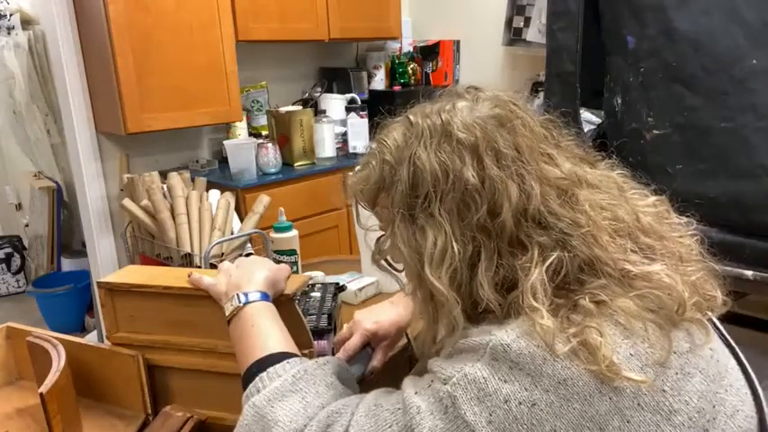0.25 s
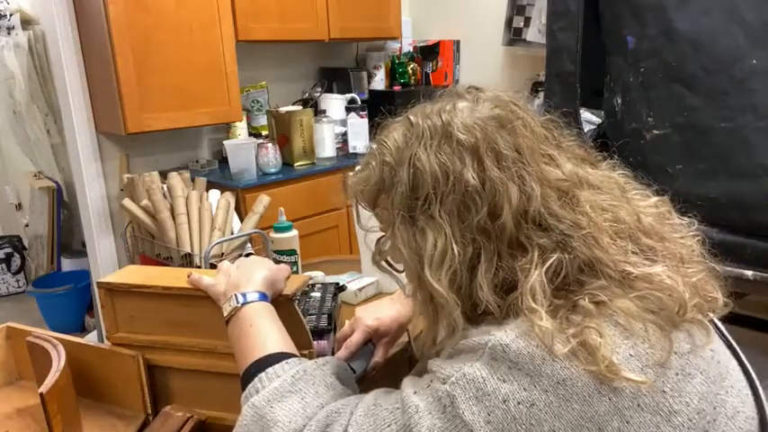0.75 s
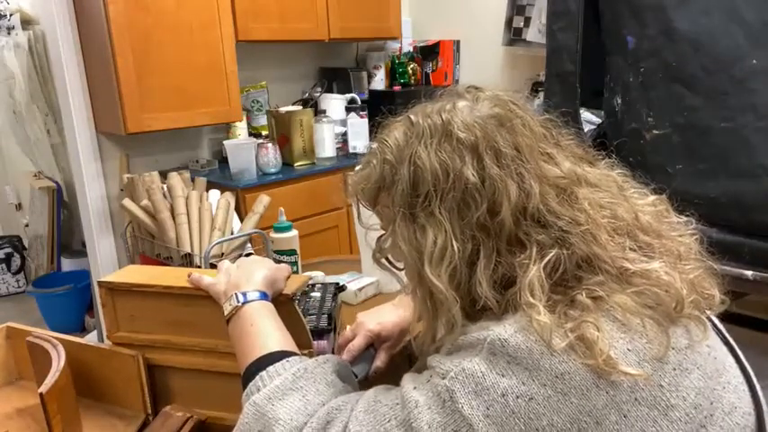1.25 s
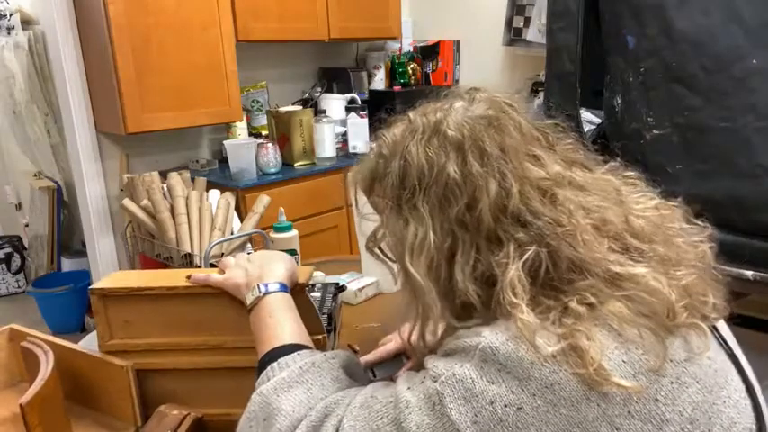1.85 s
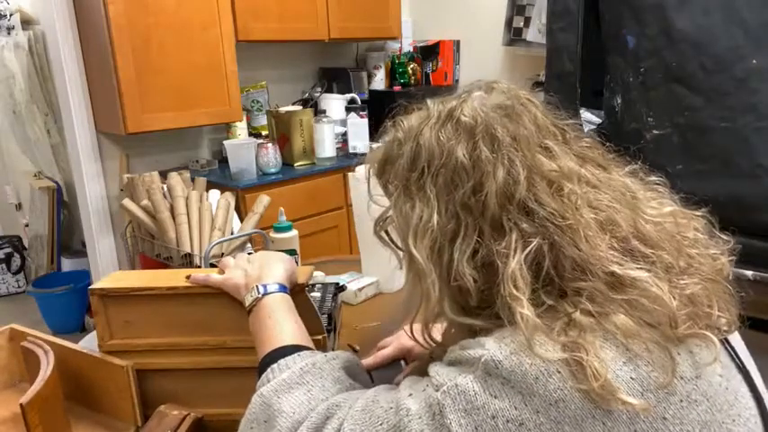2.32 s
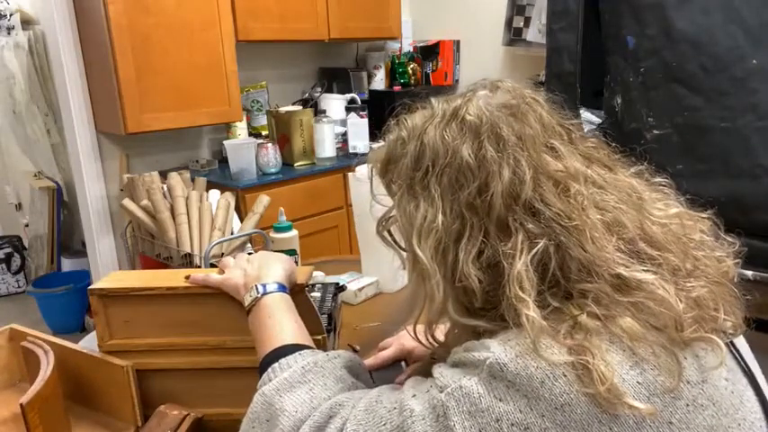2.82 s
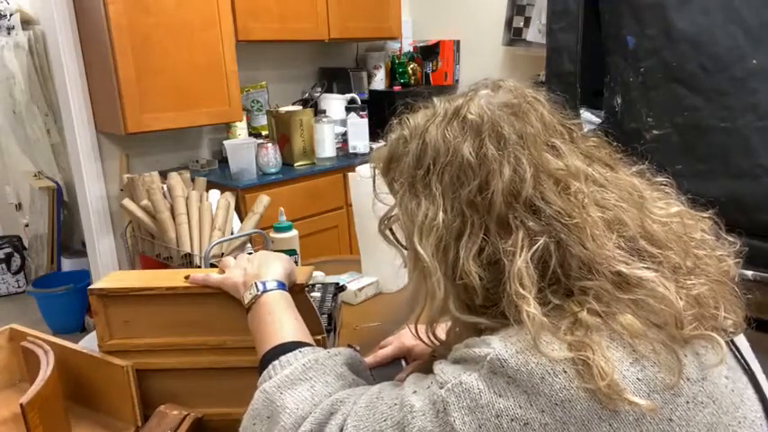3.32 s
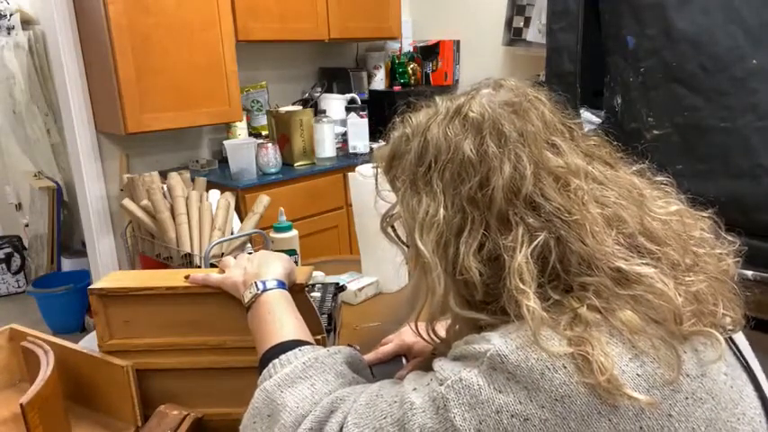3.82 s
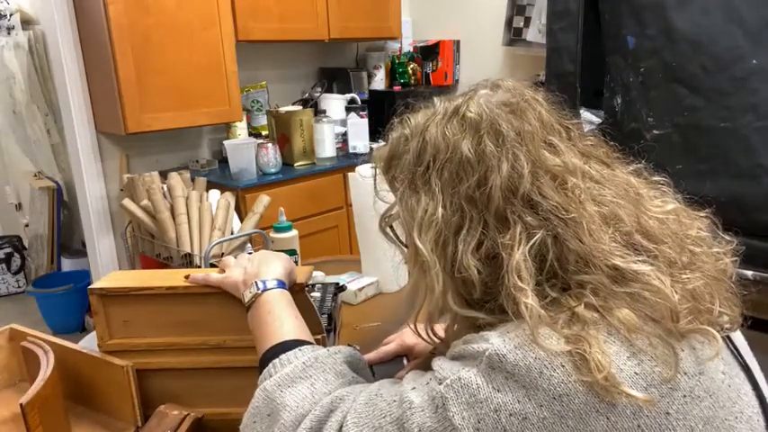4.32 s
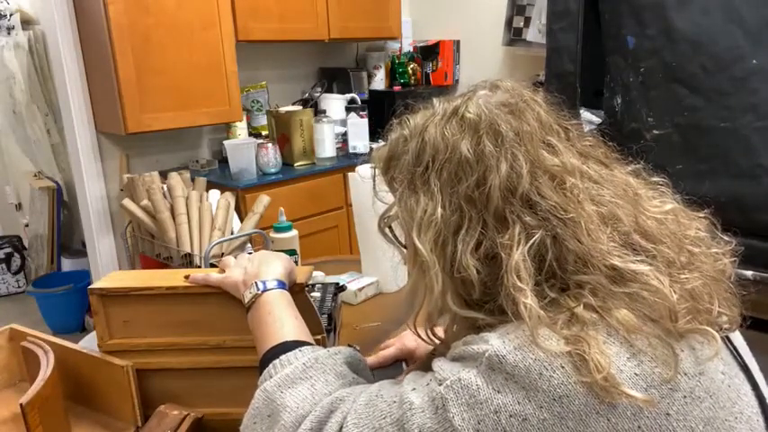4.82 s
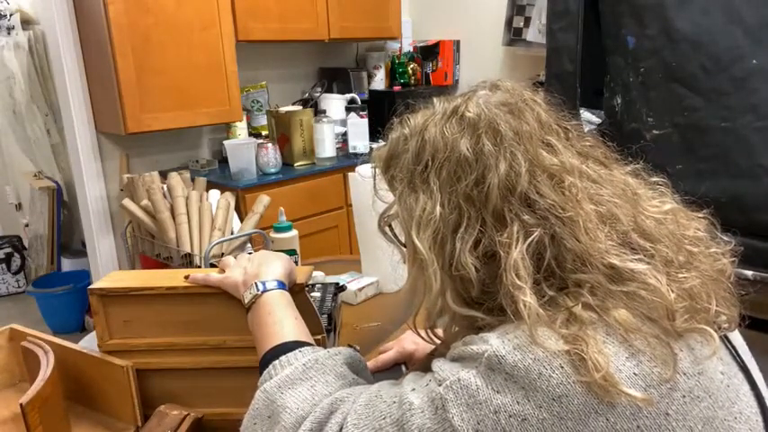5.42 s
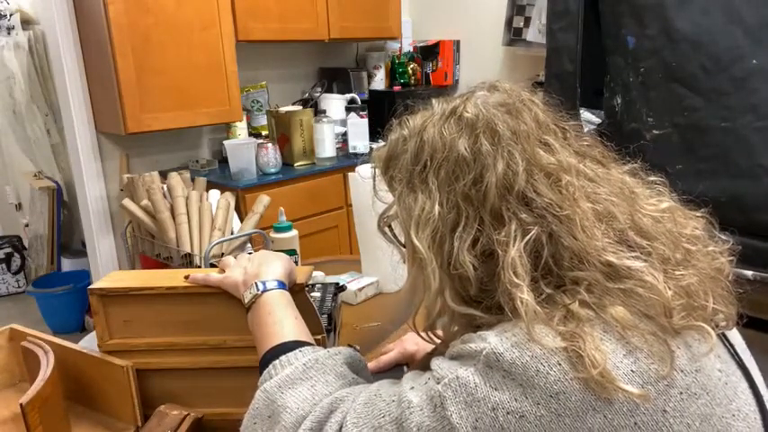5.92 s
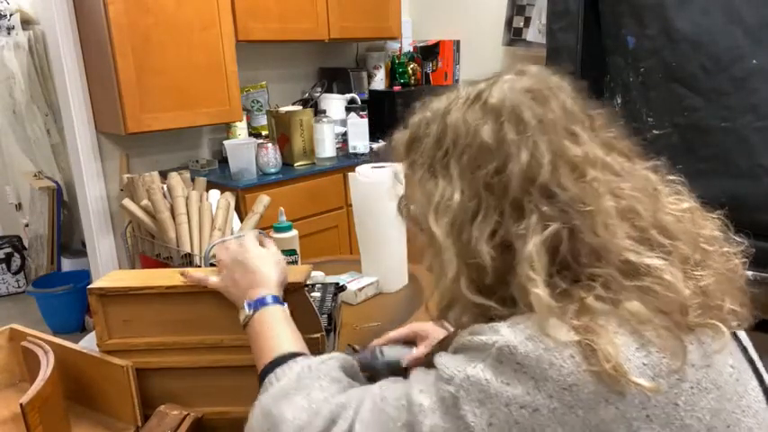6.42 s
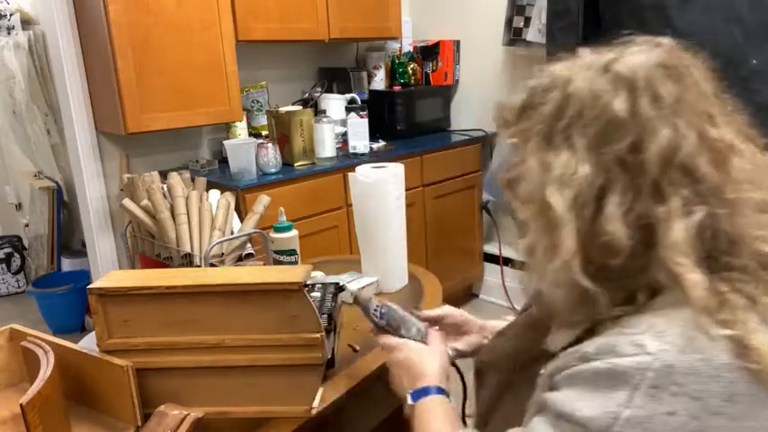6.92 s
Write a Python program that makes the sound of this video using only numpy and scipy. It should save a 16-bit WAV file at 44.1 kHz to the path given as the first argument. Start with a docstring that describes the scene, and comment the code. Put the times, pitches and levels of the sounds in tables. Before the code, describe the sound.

Close high-speed motor whine and rushing air, with four gritty, buzzing grinding passes on hollow wood, a sharp knock between them, then free running.

```python
"""A handheld rotary tool grinds old glue off a wooden drawer in a workshop, heard through one microphone.
Its motor sags under load and recovers; the fan whines at 18 times shaft speed over rushing cooling air.
The bit strikes the wood once a turn: a buzz of shaft overtones, uneven chatter and gritty hiss.
Thumps, a few knocks that ring the drawer and bounces of the bit on every second turn join in,
over low workshop rumble."""
import sys
import numpy as np
from scipy import signal
from scipy.fft import rfft, irfft
from scipy.io import wavfile
from scipy.ndimage import uniform_filter1d

SR = 44100
rng = np.random.default_rng(int(sys.argv[2]) if len(sys.argv) > 2 else 0)


def store_pcm(level_fs):
    """Save levels as 16-bit WAV."""
    pcm = np.round(np.clip(level_fs, -1, 1) * 32767).astype(np.int16)
    wavfile.write(sys.argv[1], SR, np.atleast_2d(pcm).T)


N = 315311
T = np.arange(N) / SR  # s

# shaft speed: time_s, speed_hz (turns per second)
SHAFT_SPEED = [(0.0, 419.6), (0.11, 418.9), (0.35, 406.6), (0.63, 396.8), (0.87, 393.0), (1.04, 394.2),
               (1.29, 391.6), (1.85, 408.1), (2.27, 414.2), (2.69, 398.1), (3.22, 383.0), (3.58, 380.2),
               (3.91, 373.3), (4.09, 374.4), (4.58, 399.5), (4.77, 399.0), (5.15, 409.8), (5.6, 403.6),
               (5.82, 403.2), (5.97, 406.5), (6.26, 405.6), (6.63, 413.6), (7.15, 418.2)]
# fan whine, swelling and fading as the tool turns in the hand: time_s, level_db
FAN_WHINE = [(0, -36.5), (.3, -38.5), (.7, -45), (1.4, -37), (1.74, -47), (2.1, -31), (2.32, -43.5),
             (2.7, -29.5), (2.95, -42), (3.15, -36), (3.8, -46), (3.98, -29), (4.3, -44), (4.64, -36.5),
             (5.1, -38.5), (5.38, -28), (5.68, -43.5), (6.06, -32), (6.5, -36), (6.62, -27), (6.94, -32),
             (7.1, -23)]
# tool body resting on the drawer, passing the shake on: start_s, end_s, level_db (before SHAKE_TRIM_DB)
BODY_LEAN = (1.39, 1.585, -42.5)
# shaft shake at firm pressure, one value per pass: level_db (before SHAKE_TRIM_DB)
PRESSED_SHAKE = [-26, -27, -27, -24.5]
# commutator lines round the 8th overtone: offset_hz, level_db
COMMUTATOR_LINES = [(-123, -49.5), (0, -51.5), (123, -56)]
# cooling air, louder once the tool leaves the drawer: time_s, level_db
AIR_LEVEL = [(0, -35.5), (1.5, -35.5), (2.2, -36), (4, -37), (5, -35), (6.3, -35), (6.6, -34),
             (7.15, -28.5)]
# cooling air spectrum: frequency_hz, relative_db (per Hz)
AIR_SPECTRUM = [(270, -12.5), (550, 5.5), (1000, 12.5), (1700, 8), (2700, 2), (3300, 7), (5000, 6),
                (7000, 10), (8300, 3), (13500, 1.5), (15600, -4)]
# workshop rumble spectrum: frequency_hz, relative_db (per Hz)
RUMBLE_SPECTRUM = [(20, -60), (40, -35), (65, 3), (160, -10), (300, -4.5), (900, -20.5)]
# low thumps of hand or tool on the bench: start_s, level_db
BENCH_THUDS = [(.002, -37), (1.339, -30), (1.605, -37), (4.538, -35), (6.24, -37)]
# one table per pass of the bit: time_s, buzz_level_db (pressure), brightness_db (per overtone), even_lift_db
BIT_PASSES = [
    [(.09, -29, -3, 7), (.178, -15, 2, -16), (.21, -28, -0.5, -3), (.3, -23.5, 1, -6), (.4, -26, -2, -7.5),
     (.52, -27, -1, -8), (.64, -23, -2.5, 2), (.74, -23, -1, 1), (.83, -20.5, -1.5, 1.5),
     (1.03, -29.5, -0.5, -1), (1.08, -29, 0, 6), (1.18, -25, 0, -3.5), (1.3, -26.5, 0, 4),
     (1.41, -39, -3, 6)],
    [(2.228, -30.5, -1.5, 8.5), (2.4, -26, 0, 6), (2.53, -30.5, 0, 2), (2.62, -27, -0.5, 2),
     (2.92, -29, -1, 5), (3.05, -27, -1.5, 3), (3.1, -22.5, 0.5, -1), (3.27, -23.5, 2, -3),
     (3.53, -26, -2, 4), (3.64, -19.5, 0, -0.5), (3.8, -22.5, 3.5, -10), (3.95, -27, -2, 5),
     (4.04, -24.5, 2, -7), (4.12, -30.5, -4, 7), (4.16, -34, 4.5, -10)],
    [(4.17, -35, -3, 3), (4.34, -37.5, -4.5, 5), (4.4, -42, -5.5, 10), (4.46, -43, 0, -4),
     (4.556, -43, -5, 6), (4.59, -28.5, -1.5, 1), (4.73, -30, -2, 5.5), (4.8, -41, -0.5, 8)],
    [(5.133, -32, 3, 1), (5.2, -26.5, 1, 0), (5.42, -27, 1.5, 3), (5.56, -28.5, -1, 2),
     (5.71, -27.5, -0.5, 3), (5.75, -38.5, 1, -2), (5.81, -27, -0.5, 4), (5.848, -63, -3, -4),
     (5.875, -29, -1, 2), (5.95, -44.5, 1, 7), (5.98, -34.5, 1, 0), (6.13, -26, 0, 2),
     (6.18, -31.5, -0.5, 7), (6.23, -27.5, 1, 1), (6.27, -48, 1, 14)],
]
# how the wood under the bit passes the buzz, one row per pass: relative_db of overtones 2, 3, 4, 5, 6
WOOD_RESPONSE = [(-7, -2.5, -5, -21, -10.5), (-6.5, 1, -4.5, -2.5, -9.5), (-4, -6, -6.5, 5, 3),
                 (4, 2, -7, -4, -4.5)]
# bit snagging in hard glue: centre_s, half_length_s, chatter_lift_db, grit_lift_db
GLUE_SNAGS = [(0.14, 0.086, -5, 4), (0.239, 0.048, 12, 6.5), (0.78, 0.051, 5, -4), (1.24, 0.29, 7, 1.5),
              (2.24, 0.044, -13, 5), (2.923, 0.36, 13, 1), (3.09, .1, -0.5, 3), (3.696, 0.16, 5, 7.5),
              (4.023, 0.23, 10, 10.5), (4.447, 0.042, 9, 11), (4.66, 0.23, 11.5, 3.5),
              (4.778, 0.014, 0, 11), (5.13, 0.11, -15, 11), (5.752, 0.042, 27.5, 3.5), (5.973, 0.093, 9, 9),
              (6.234, 0.044, 17.5, 0.5)]
# grit hiss spectrum: frequency_hz, relative_db (per Hz)
GRIT_SPECTRUM = [(600, -64), (1500, -33), (2500, 0.5), (3700, -0.5), (5000, -5.5), (7000, 7), (8200, -5.5),
                 (12000, -9.5), (15500, -18)]
# high shaft overtones: overtone_number, level_db (relative to the grit level)
HIGH_OVERTONES = [(7, -11), (9, -10.5), (12, -13), (17, -12), (21, -18), (28, -18), (36, -25)]
# bit against wood, one row per pass: high_overtone_lift_db, ring_hz, ring_height_db
BIT_RING = [(.5, 4900, 7), (-4, 3700, 4), (-1, 3600, 6), (-1, 3680, 7)]
# drawer modes: frequency_hz, relative_db, t60_s
DRAWER_MODES = [(190, -16, .05), (365, -5, .09), (500, -2, .03), (641, 0, .04), (830, -6, .025),
                (1020, -6, .025), (1276, -3, .03), (1560, -5, .03), (1950, -12, .025), (2514, -16, .03)]
# tool body against the drawer: time_s, level_db
BODY_KNOCKS = [(1.584, -13.5), (1.588, -6), (4.547, -22), (5.767, -35), (6.191, -32), (6.226, -26.5)]
# bit landing on every second turn: start_s, length_s, level_db
BIT_BOUNCES = [(3.911, 0.1, -43), (4.24, 0.12, -40), (4.35, 0.081, -40), (4.431, 0.15, -45),
               (4.562, 0.067, -43.5)]

# faint high tone, gliding with shaft speed and wavering slightly: offset above the fan whine, level
HIGH_TONE_OFFSET_HZ, HIGH_TONE_DB = 7000, -59
# free shake at or above TOP_SPEED_HZ, and its fall per Hz of speed below that; both before SHAKE_TRIM_DB
FREE_SHAKE_DB, TOP_SPEED_HZ, FREE_DB_PER_HZ = -42, 414.3, 0.9
# pressed shake: dB per dB of pressure, wood ring it swells near, pressure averaging time
SHAKE_DB_PER_DB, WOOD_RING_HZ, WOOD_RING_DB_PER_HZ2, BUILD_S = 0.9, 387.3, .025, 0.052
SHAKE_TRIM_DB = -2.5
MAINS_HZ = 120  # throb rate of the cooling air
RUMBLE_DB = -55.5
THUD_HZ, THUD_T60_S = 157, .14
FIRM_DB = -25  # buzz level at firm pressure
ATTACK_S, RELEASE_S = 0.0019, 0.012
CHATTER_DB, CHATTER_DB_PER_DB = -38.5, 0.95  # at firm pressure without snags; dB per dB of pressure
GRIT_DB, GRIT_DB_PER_DB = -37.5, 0.56
BASS_CUT_HZ, TREBLE_CUT_HZ = 48, 15720


def gain_of(db):
    """Amplitude factor of a level in dB."""
    return np.exp(np.asarray(db) * np.log(10) / 20)


def evened(x):
    """Scale to rms 1."""
    return x / np.sqrt(np.mean(x ** 2) + 1e-20)


def curves(rows):
    """Table columns as curves over all samples."""
    time_s, *columns = np.transpose(rows)
    return [np.interp(T, time_s, column) for column in columns]


def by_pass(rows):
    """Columns of a one-row-per-pass table, held over all samples."""
    later_starts_s = [rows_of_pass[0][0] for rows_of_pass in BIT_PASSES[1:]]
    return np.array(rows)[np.searchsorted(later_starts_s, T)].T


def waver(rate_hz):
    """Slow random curve of rms 1, low-passed near rate_hz."""
    knots = rng.standard_normal(N // 64 + 2)
    low_pass = 1 / (1 + (np.fft.rfftfreq(len(knots), 64 / SR) / rate_hz) ** 4)
    knots = evened(irfft(rfft(knots) * low_pass, len(knots)))
    ramps = np.diff(knots)[:, None] * np.arange(64) / 64
    return (knots[:-1, None] + ramps).ravel()[:N]


def noise(spectrum, patchy_db, band_hz=(0, SR)):
    """Coloured noise with drifting spectral patches; rms about 1 inside band_hz."""
    frames, hz = N // 256 + 5, np.fft.rfftfreq(1024, 1 / SR)
    real, imag, patches = rng.standard_normal((frames, 513, 3)).T
    patches = evened(uniform_filter1d(uniform_filter1d(patches, 12, 0), 12, 1))
    points_hz, points_db = np.transpose(spectrum)
    shape = gain_of(np.interp(np.log(hz + 1), np.log(points_hz), points_db))
    in_band = (hz > band_hz[0]) & (hz < band_hz[1])
    share = np.sum(shape[in_band] ** 2) / np.sum(shape ** 2)
    bins = (real + 1j * imag) * shape[:, None] * gain_of(patchy_db * patches)
    return evened(signal.istft(bins, nperseg=1024, noverlap=768)[1][:N]) / np.sqrt(share)


def overtone(turns, multiple, db, waver_db, waver_hz, jitter_rad):
    """Sine locked to the shaft; level and phase waver."""
    level = gain_of(db + waver_db * waver(waver_hz))
    phase = 2 * np.pi * (multiple * turns + rng.random()) + jitter_rad * waver(waver_hz)
    return np.sqrt(2) * level * np.cos(phase)


def butter(x, order, hz, kind):
    """Butterworth filter."""
    return signal.sosfilt(signal.butter(order, hz, kind, fs=SR, output="sos"), x)


def touch():
    """1 while the bit is on the wood: quick landing, softer lift."""
    on = 0
    for rows in BIT_PASSES:
        landing = (T - rows[0][0]) / ATTACK_S
        lift = (rows[-1][0] - T) / RELEASE_S + 1
        on = on + np.clip(np.minimum(landing, lift), 0, 1)
    return on


def snags(column):
    """Level change in dB: a short triangle at each snag."""
    return sum(row[column] * np.clip(1 - abs(T - row[0]) / row[1], 0, 1) for row in GLUE_SNAGS)


def fan_whine(turns):
    """Fan tone at 18 times shaft speed, with a faint high tone a fixed offset above that glides with it."""
    whine = overtone(turns, 18, curves(FAN_WHINE)[0], waver_db=4, waver_hz=15, jitter_rad=.15)
    high_tone_turns = turns + HIGH_TONE_OFFSET_HZ * T / 18
    return whine + overtone(high_tone_turns, 18, HIGH_TONE_DB, waver_db=2, waver_hz=6, jitter_rad=.15)


def shaft_shake(turns, speed_hz, on, press_db):
    """Once-a-turn shake: grows toward top speed when free, follows pressure and wood ring when pressed."""
    free = gain_of(FREE_SHAKE_DB - FREE_DB_PER_HZ * np.clip(TOP_SPEED_HZ - speed_hz, 0, 12))
    lean_start_s, lean_end_s, lean_db = BODY_LEAN
    free += gain_of(lean_db) * np.clip(np.minimum(T - lean_start_s, lean_end_s - T) / 0.0069, 0, 1)
    ring_db = -WOOD_RING_DB_PER_HZ2 * (speed_hz - WOOD_RING_HZ) ** 2
    slow_press_db = uniform_filter1d(press_db, round(BUILD_S * SR))
    pressed = gain_of(by_pass(PRESSED_SHAKE) + ring_db + SHAKE_DB_PER_DB * slow_press_db)
    tone = overtone(turns, 1, SHAKE_TRIM_DB, waver_db=1.72, waver_hz=25.8, jitter_rad=0.027)
    return ((1 - on) * free + on * pressed) * tone


def commutator(turns):
    """Faint lines on and beside the 8th overtone."""
    return sum(overtone(turns + offset_hz * T / 8, 8, db, waver_db=2, waver_hz=3, jitter_rad=.3)
               for offset_hz, db in COMMUTATOR_LINES)


def cooling_air():
    """Broadband rush that throbs with the mains."""
    throb = 1 + 0.056 * np.cos(2 * np.pi * MAINS_HZ * T)
    level = gain_of(curves(AIR_LEVEL)[0] + .5 * waver(6))
    return level * throb * noise(AIR_SPECTRUM, patchy_db=.8)


def rumble():
    """Low workshop rumble: coloured noise at a constant level."""
    return gain_of(RUMBLE_DB) * noise(RUMBLE_SPECTRUM, patchy_db=2.0)


def thuds():
    """Decaying puffs of low noise round one dull pitch."""
    low = evened(butter(rng.standard_normal(N), 2, [0.89 * THUD_HZ, 1.43 * THUD_HZ], "band"))
    level = 0
    for start_s, db in BENCH_THUDS:
        since_s = np.maximum(T - start_s, 0)
        level = level + np.clip(since_s / 0.01, 0, 1) * gain_of(db - 60 * since_s / THUD_T60_S)
    return low * level


def drawer(blows):
    """Wooden box modes ring after each blow; the box is too small to send out deep bass."""
    t = T[:4000]
    ring = sum(gain_of(db - 60 * t / t60_s) * np.sin(2 * np.pi * hz * t) for hz, db, t60_s in DRAWER_MODES)
    ring *= np.minimum(t / 0.00052, 1)  # rounded blow
    ring = butter(ring, 3, 240, "high")
    return signal.oaconvolve(blows, ring / abs(ring).max())[:N]


def buzz(turns, press_db, bright_db, even_db):
    """The even part of the blows gives clean overtones; their uneven sizes give chatter."""
    gains = [gain_of(db + bright_db * (k - 4) + even_db * (k % 2 == 0))
             for k, db in enumerate(by_pass(WOOD_RESPONSE), 2)]
    total = np.linalg.norm(gains, axis=0)
    tones = [gain / total * overtone(turns, k, 0, waver_db=2.2, waver_hz=10, jitter_rad=.25)
             for k, gain in enumerate(gains, 2)]
    smear = sum(tone * waver(188) for tone in tones)  # turn-to-turn differences blur each overtone
    lands = np.diff(np.floor(turns), prepend=0)
    sizes = rng.standard_normal(N) * gain_of(1.8 * waver(30))
    rattle = gain_of(-15.0) * evened(drawer(lands * sizes))
    chatter_level = gain_of(CHATTER_DB + CHATTER_DB_PER_DB * press_db + snags(column=2))
    return gain_of(FIRM_DB + press_db) * sum(tones) + chatter_level * (smear + rattle)


def grit(turns, speed_hz, press_db):
    """Hiss puffing once a turn as the grains bite, plus thin high overtones lifted near the bit's ring."""
    puffs = evened(1 + .6 * np.cos(2 * np.pi * turns)) * gain_of(1.6 * waver(22))
    out = gain_of(-5) * puffs * noise(GRIT_SPECTRUM, patchy_db=1.2, band_hz=(3500, 6400))
    lift_db, ring_hz, ring_height_db = by_pass(BIT_RING)
    number, number_db = np.transpose(HIGH_OVERTONES)
    for k in range(7, 37):
        ring_db = ring_height_db / (1 + ((k * speed_hz - ring_hz) / 330) ** 2)
        db = np.interp(k, number, number_db) + lift_db + ring_db
        out += overtone(turns, k, db, waver_db=4, waver_hz=18, jitter_rad=.55)
    return gain_of(GRIT_DB + GRIT_DB_PER_DB * press_db + snags(column=3)) * out


def knocks():
    """Short rounded blows of the tool body ring the drawer."""
    blows = np.zeros(N)
    for time_s, db in BODY_KNOCKS:
        blows[round(time_s * SR)] = gain_of(db)
    return drawer(blows)


def workshop(x):
    """Sparse reflections of random sign, dying away with a t60 of 0.26 s."""
    grid = np.arange(300, SR // 3, 20)
    at = grid + rng.integers(0, 20, len(grid))
    taps = np.zeros(SR // 2)
    taps[at] = rng.choice([-1., 1.], len(at)) * gain_of(-60 * at / SR / 0.26)
    return signal.oaconvolve(x, taps / np.linalg.norm(taps))[:N]


def bounces(turns):
    """Landing every second turn: rough line at half shaft speed and uneven drawer rattle."""
    level = 0
    for start_s, length_s, db in BIT_BOUNCES:
        rise = (T - start_s) / 0.0059
        fall = (start_s + length_s - T) / 0.062
        level = level + gain_of(db) * np.clip(np.minimum(rise, fall), 0, 1)
    line = overtone(turns, .5, 0, waver_db=3, waver_hz=30, jitter_rad=.5)
    lands = np.diff(np.floor(turns / 2), prepend=0) * (1 + .9 * rng.standard_normal(N))
    rattle = butter(drawer(lands), 2, [330, 900], "band")
    return level * (line + gain_of(5.5) * evened(rattle))


def scene():
    """Sum all sources; both channels are alike."""
    speed_hz = curves(SHAFT_SPEED)[0]
    turns = np.cumsum(speed_hz) / SR
    buzz_db, bright_db, even_db = curves(np.vstack(BIT_PASSES))
    press_db, on = buzz_db - FIRM_DB, touch()
    sound = fan_whine(turns) + shaft_shake(turns, speed_hz, on, press_db) + commutator(turns)
    sound += cooling_air() + rumble() + thuds()
    sound += on * (buzz(turns, press_db, bright_db, even_db) + grit(turns, speed_hz, press_db))
    hits = knocks()
    sound += hits + gain_of(-10) * workshop(hits)
    sound += bounces(turns)
    return np.array([sound, sound])


def record(dry):
    """The microphone drops the deepest bass; a steep low-pass then limits the treble."""
    thin = butter(dry, 3, BASS_CUT_HZ, "high")
    low_pass = signal.firwin(511, TREBLE_CUT_HZ, window=("kaiser", 9), fs=SR)
    return signal.oaconvolve(thin, low_pass[None], "same")


dry = scene()
out = record(dry)
store_pcm(out)
```